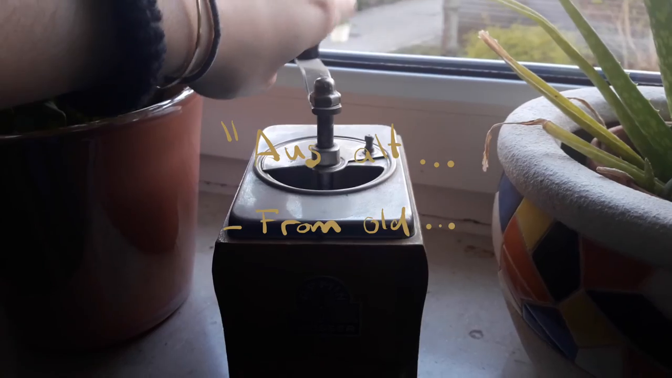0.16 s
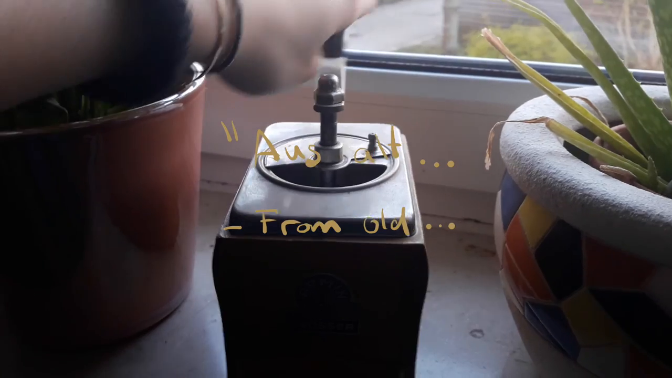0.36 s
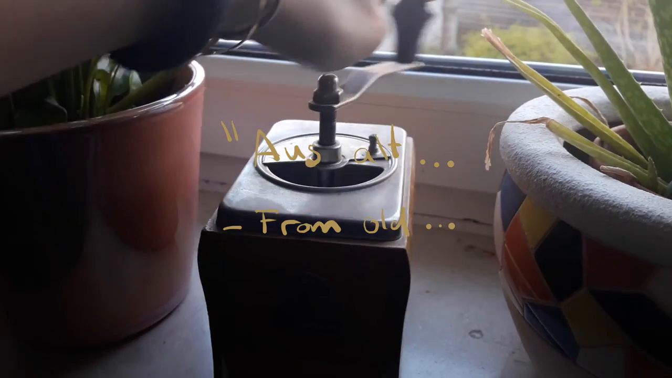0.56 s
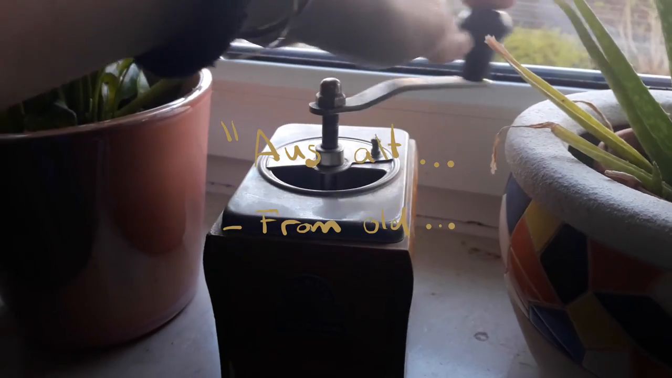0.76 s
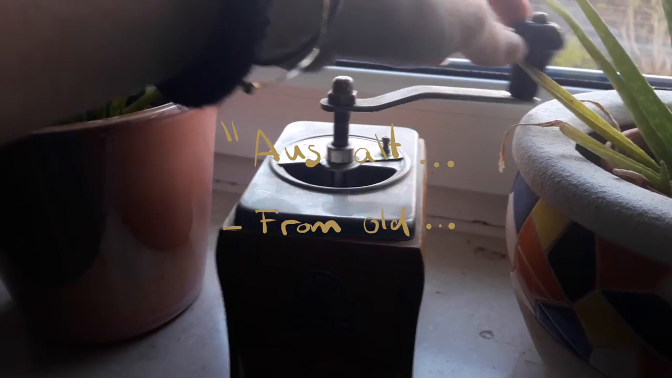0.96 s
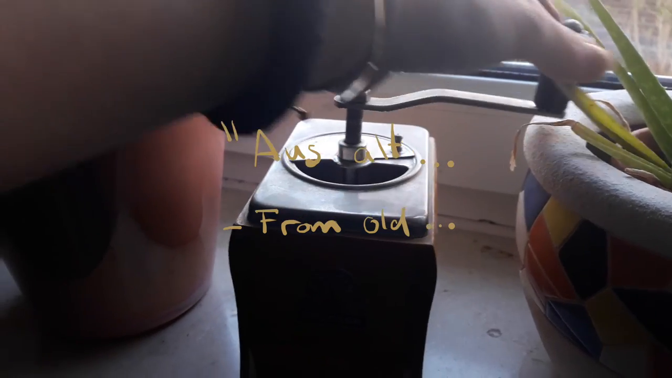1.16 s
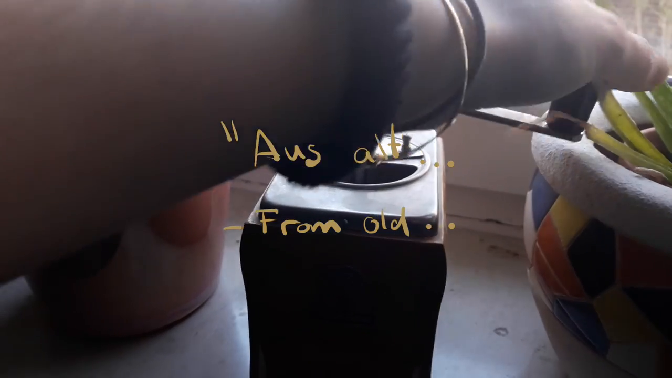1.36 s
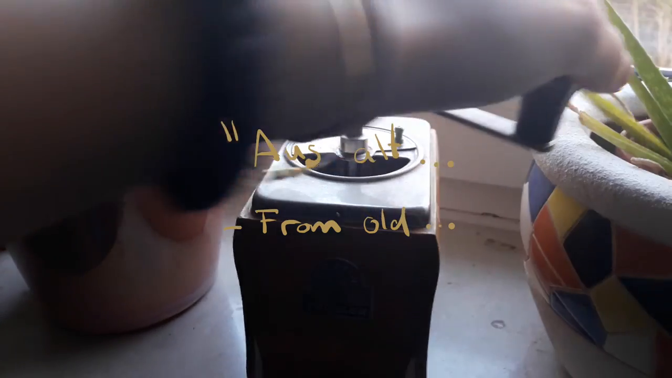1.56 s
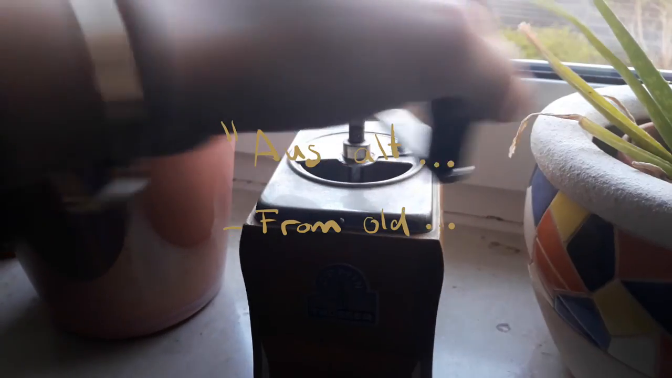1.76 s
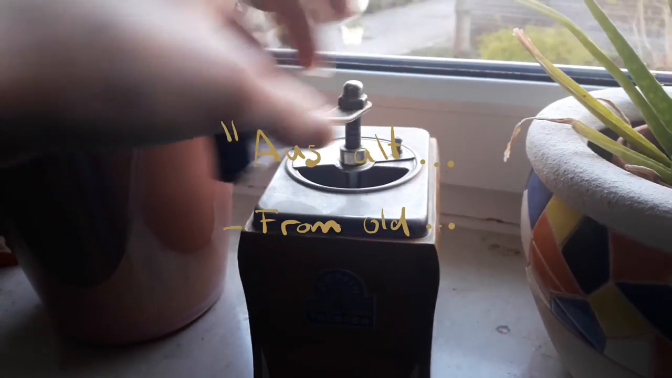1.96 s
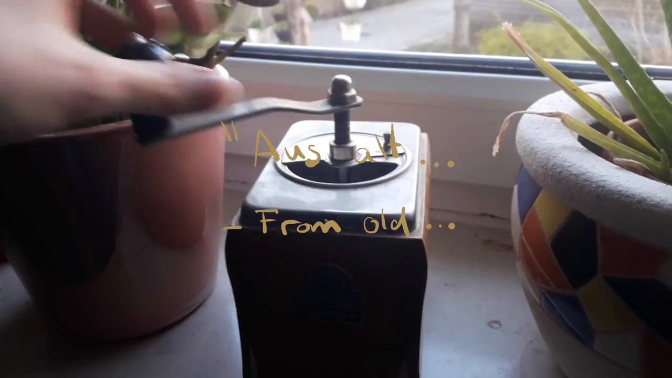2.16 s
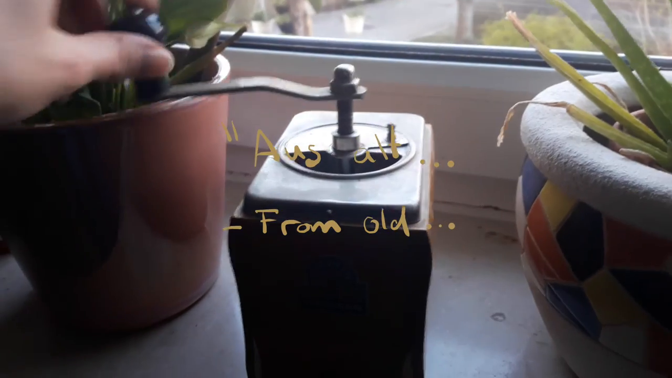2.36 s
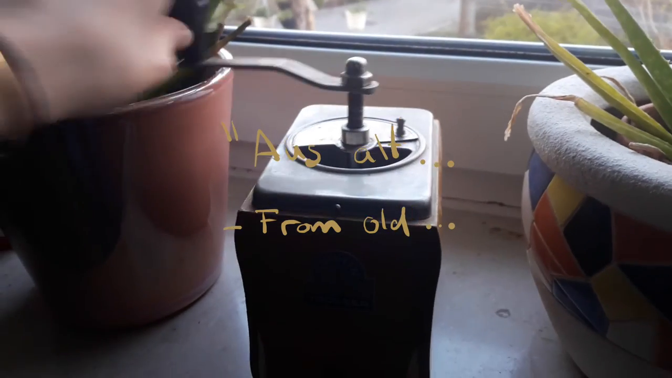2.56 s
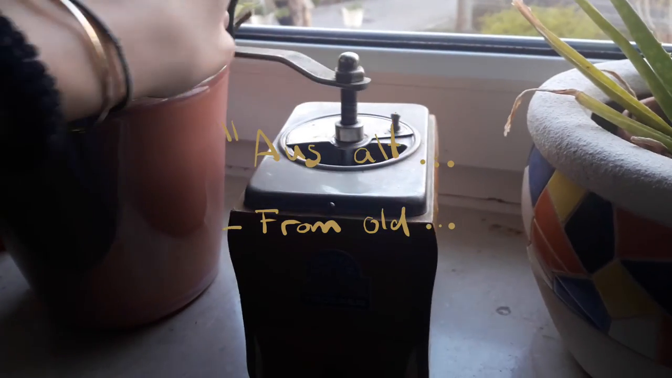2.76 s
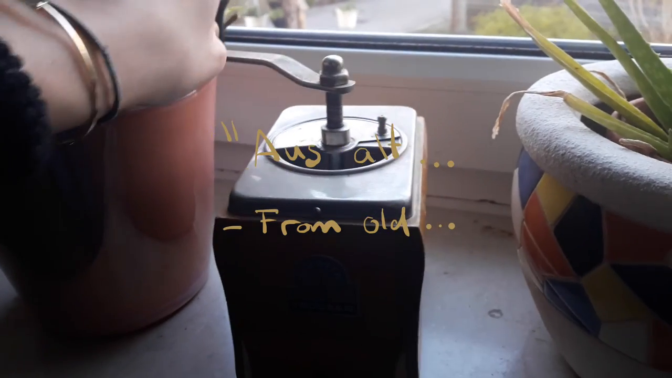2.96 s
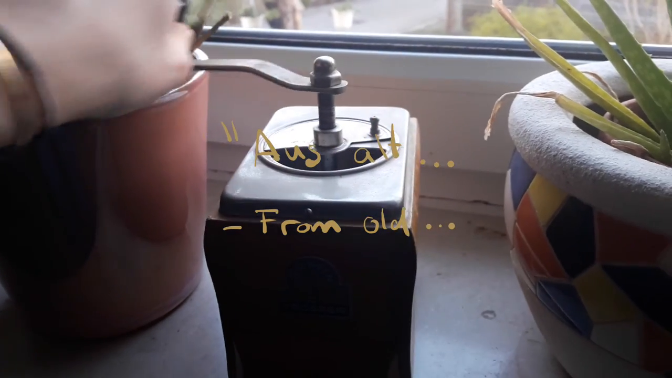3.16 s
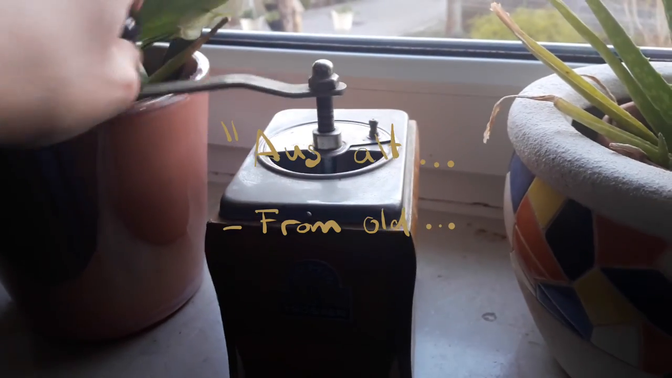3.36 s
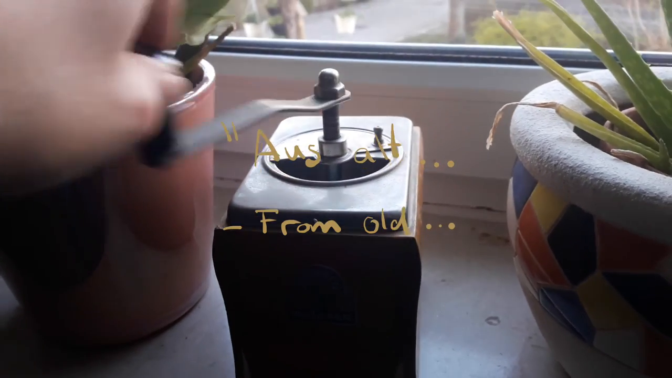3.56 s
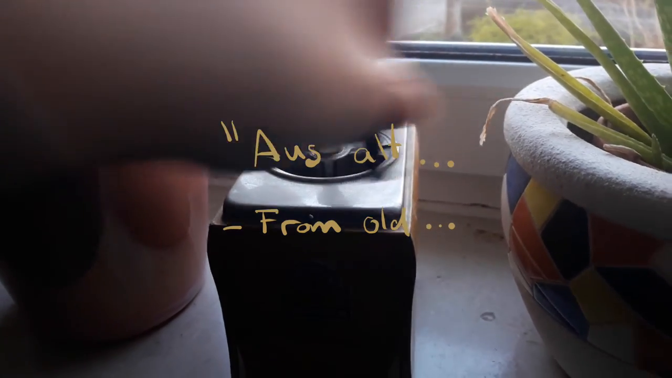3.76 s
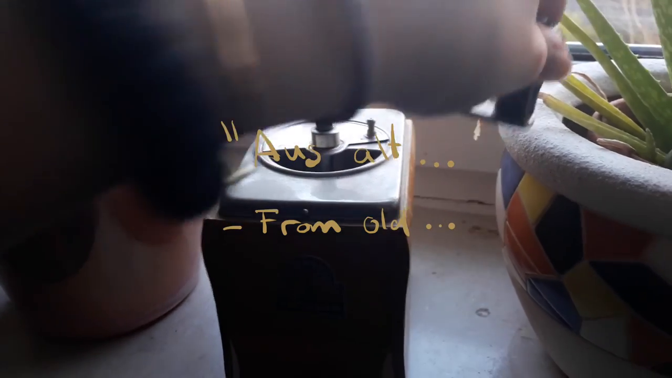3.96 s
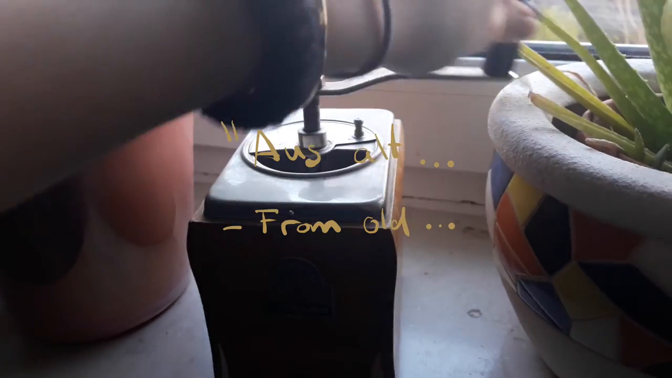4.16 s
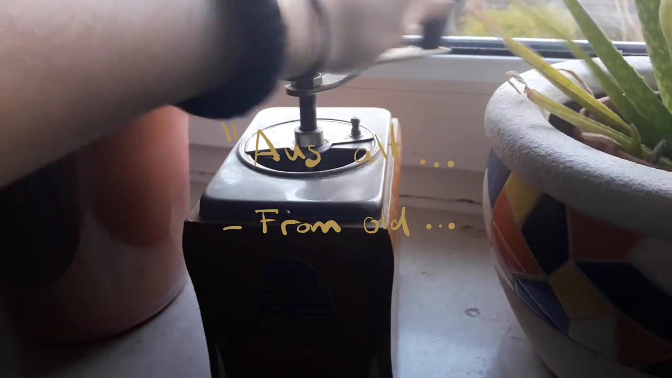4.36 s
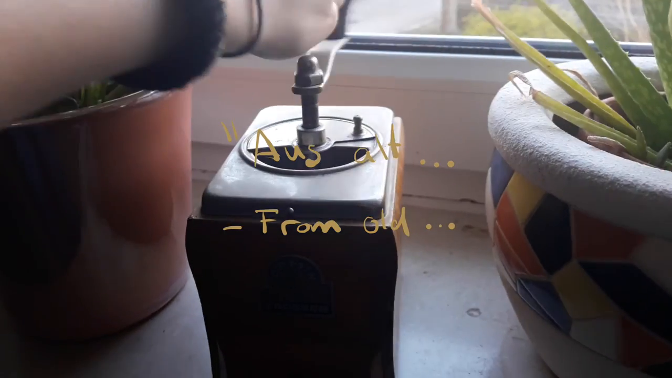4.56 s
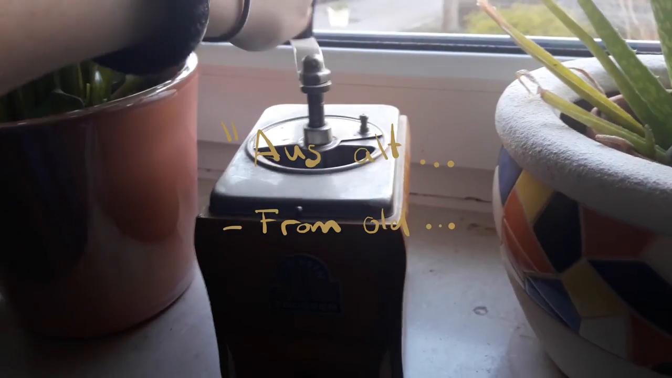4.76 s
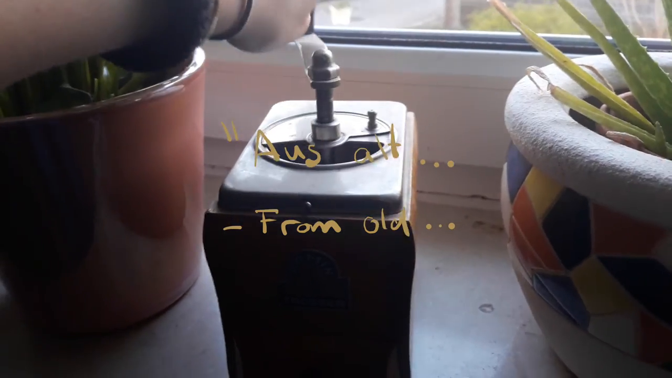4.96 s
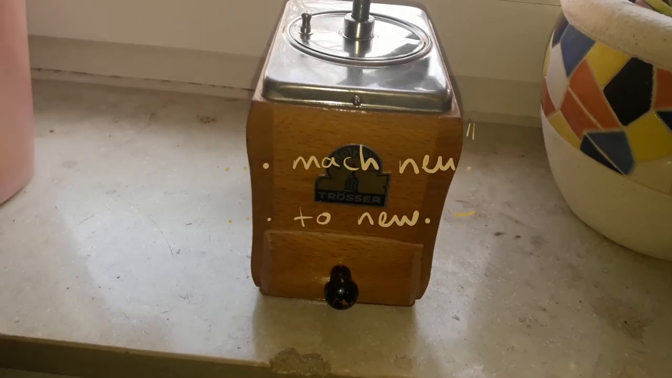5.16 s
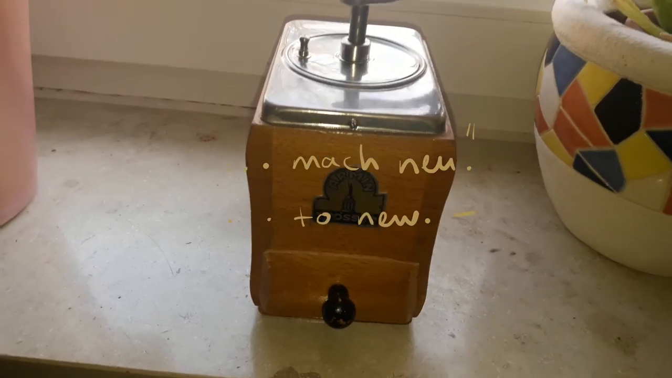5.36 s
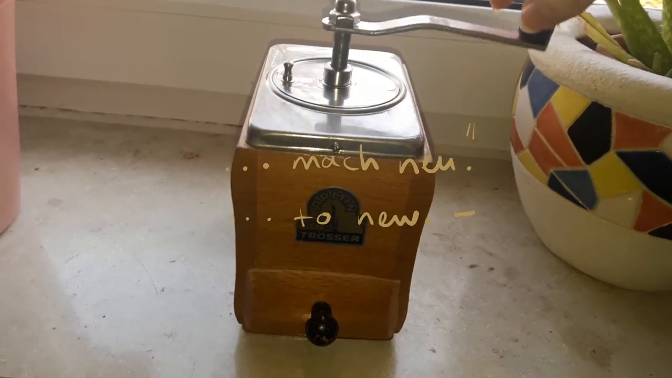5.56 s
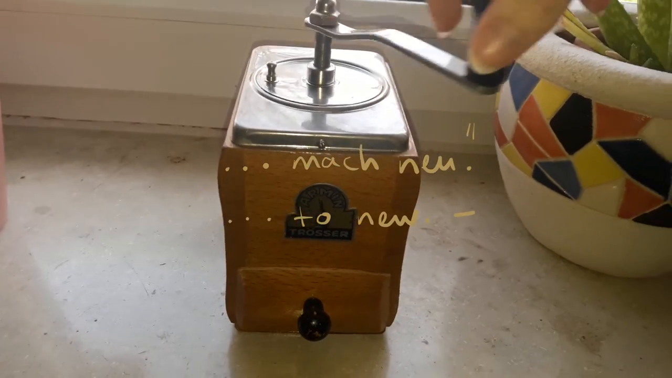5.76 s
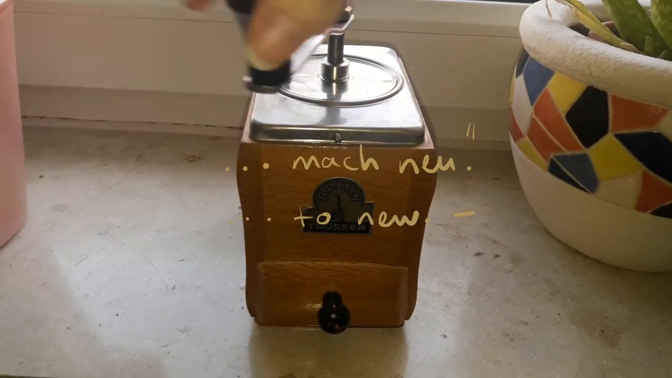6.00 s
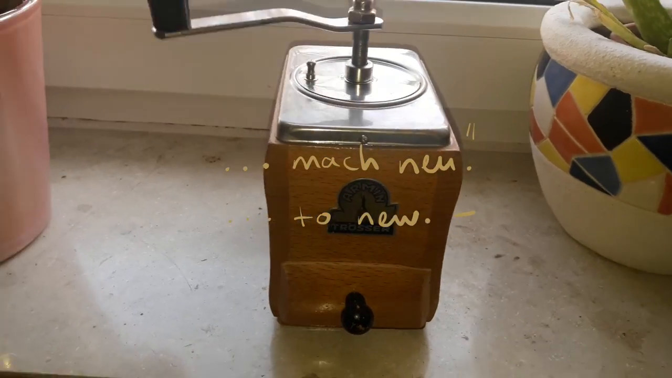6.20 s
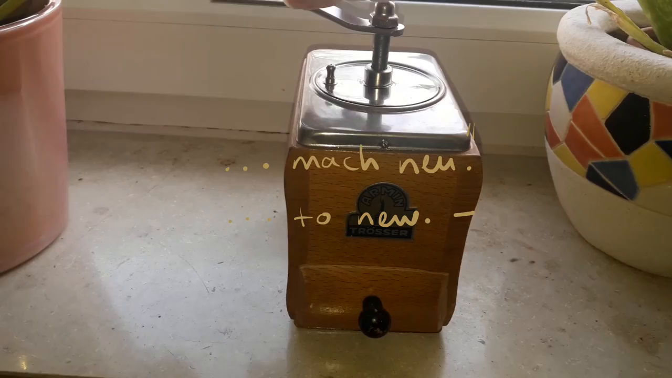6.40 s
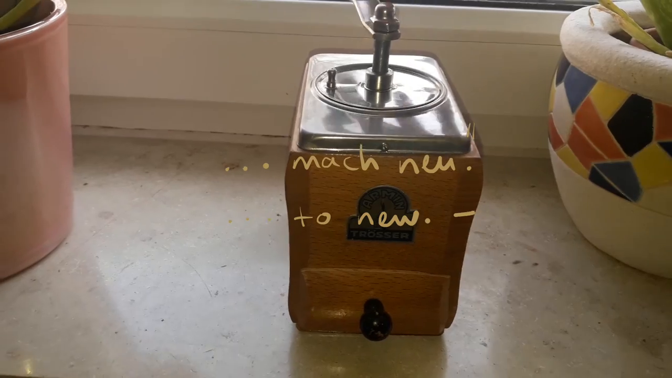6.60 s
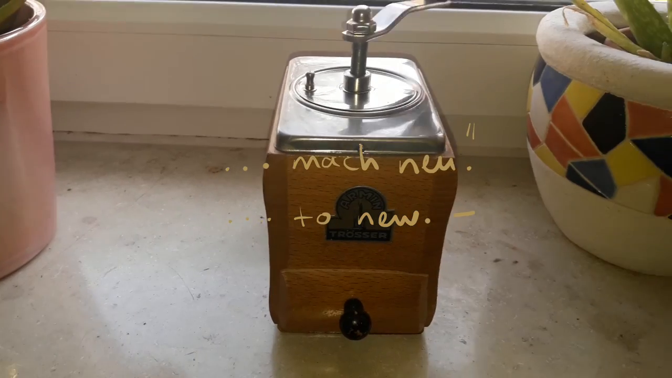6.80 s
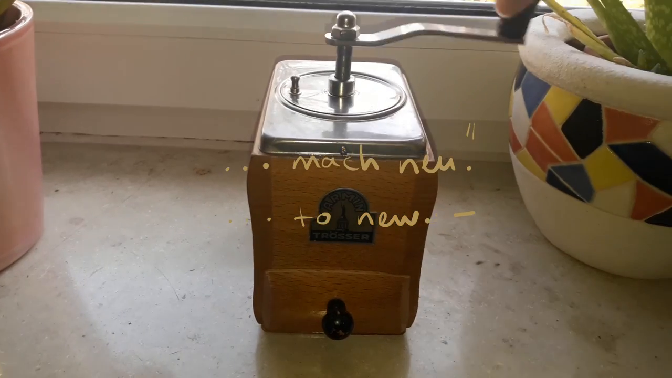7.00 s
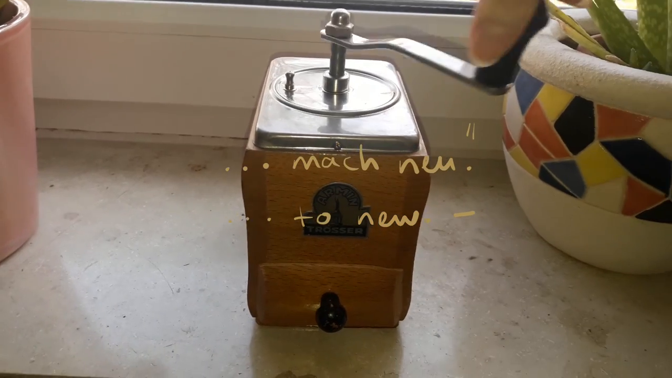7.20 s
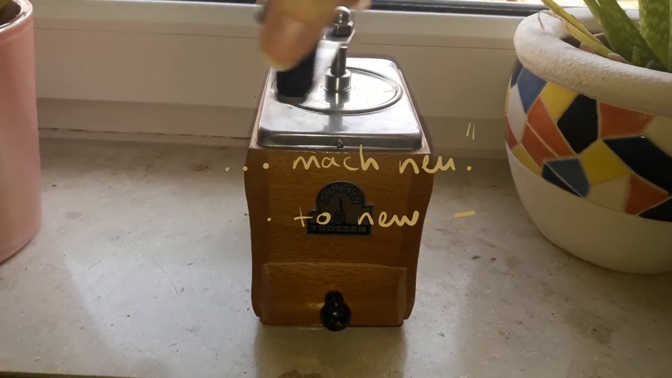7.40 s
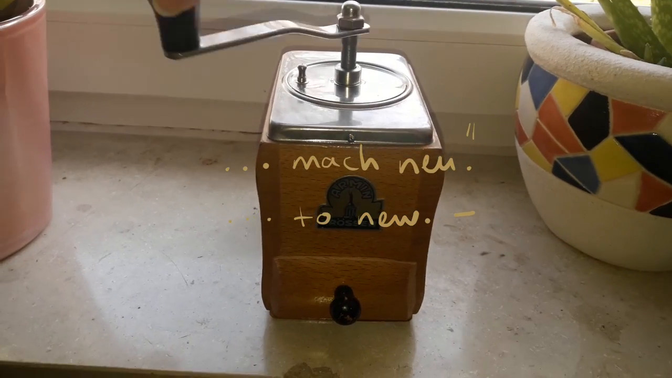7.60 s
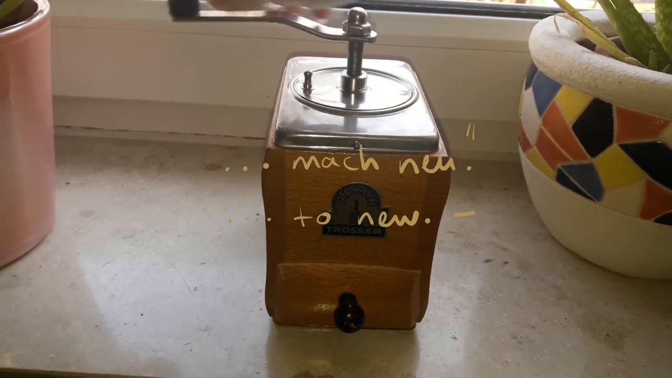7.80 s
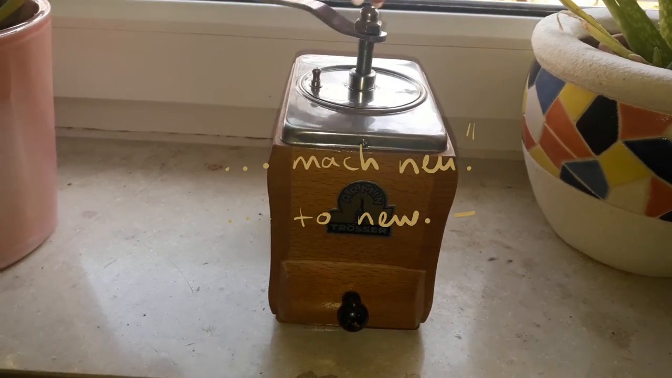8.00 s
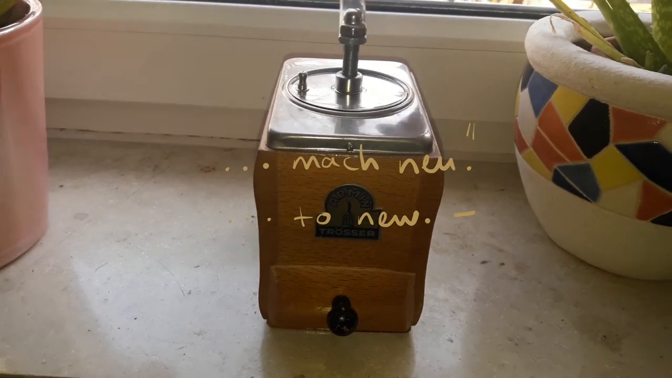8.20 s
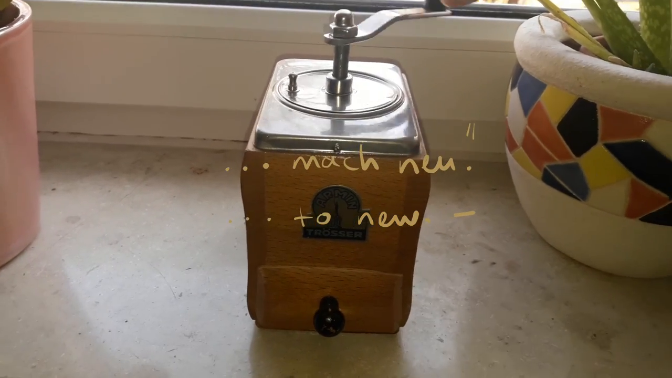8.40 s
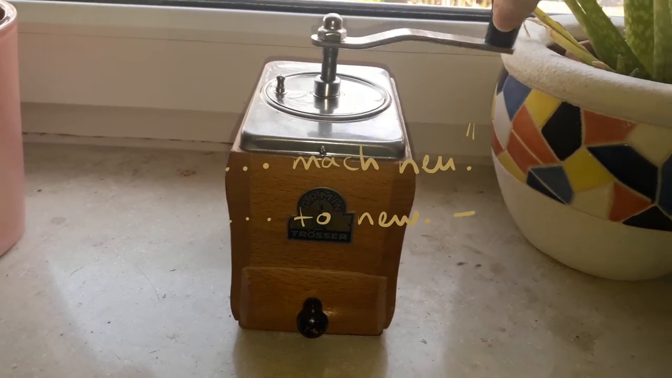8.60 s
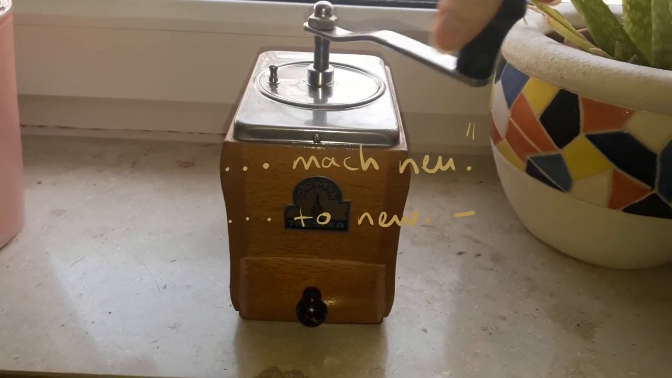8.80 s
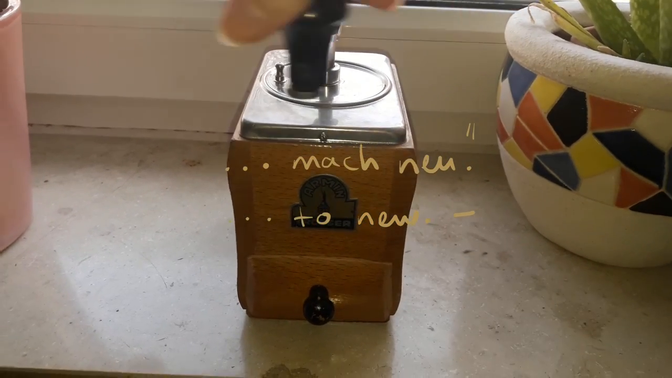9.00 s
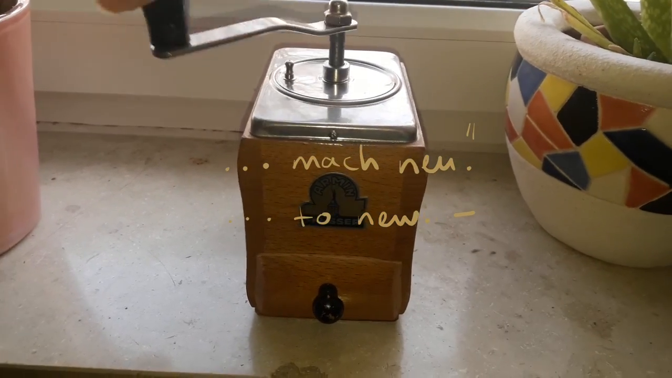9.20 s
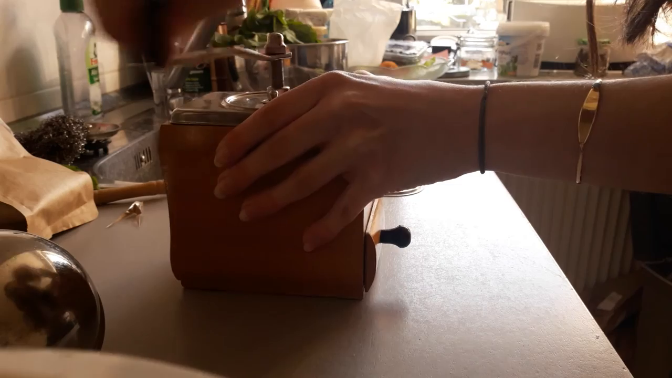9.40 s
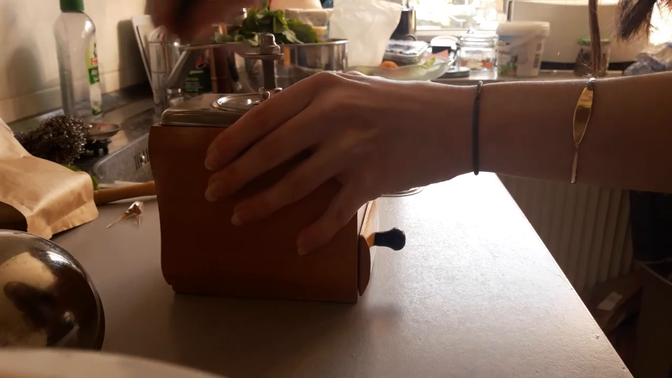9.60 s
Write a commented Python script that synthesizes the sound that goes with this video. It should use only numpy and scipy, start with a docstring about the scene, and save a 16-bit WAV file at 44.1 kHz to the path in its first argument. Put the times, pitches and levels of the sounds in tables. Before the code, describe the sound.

An old dry wooden hand mill scrapes, creaks and screeches in fits, then a newer empty one rasps through three turns before beans start crunching.

```python
"""Still kitchen air throughout, with a hum and later a rumble from outside: coloured noise and sines.
First an old wooden hand mill is cranked empty on the sill: grit scrapes, teeth catch, a sleeve brushes along.
Its dry spindle judders, creaks, squeaks and screeches near 3.5 s; a thin whistle follows near 5 s.
A newer empty mill then rasps through three turns, tight once in each: grit rings its box and hopper.
At the very end a mill on the worktop starts to crush beans: dense tiny blows on a heavy body."""
import sys
import numpy as np
from scipy import signal
from scipy.fft import rfft, irfft
from scipy.io import wavfile

SR = 44100
rng = np.random.default_rng(int(sys.argv[2]) if len(sys.argv) > 2 else 0)


def generate_wav(sig):
    """Save sig (samples, or channels by samples) to the path in sys.argv[1] as 16-bit PCM at SR."""
    pcm = np.round(np.clip(np.atleast_2d(sig).T, -1, 1) * 32767).astype(np.int16)
    wavfile.write(sys.argv[1], SR, pcm)


N = 425565
T = np.arange(N) / SR


def undb(db):
    """Decibels to gain."""
    return np.exp(np.asarray(db) * (np.log(10) / 20))


def unit(x):
    """Scale to rms 1."""
    return x / np.sqrt(np.mean(x ** 2))


def normal(y):
    """Scale to energy 1."""
    return y / np.sqrt(np.sum(y ** 2))


def curve(rows, axis=1):
    """One column of a table, joined by straight lines."""
    rows = np.asarray(rows)
    return np.interp(T, rows[:, 0], rows[:, axis])


def swell(rows, axis=1):
    """Gain from a dB column, silent outside the table's time."""
    rows, gain = np.asarray(rows), np.zeros(N)
    inside = (T >= rows[0, 0]) & (T <= rows[-1, 0])
    gain[inside] = undb(np.interp(T[inside], rows[:, 0], rows[:, axis]))
    return gain


def walk(rate):
    """Random drift with a spread near 1: `rate` chance values a second, joined by straight lines."""
    knots = rng.standard_normal(40000)
    return 1.2 * np.interp(T * rate, np.arange(len(knots)), knots)


def cycles(hz):
    """Sine that follows a changing pitch."""
    return np.sin(2 * np.pi * np.cumsum(hz) / SR)


def stroke(start, end, attack_s, release_s):
    """Gain of one movement: it builds up, holds and dies away."""
    attack = np.clip((T - start) / attack_s, 0, 1)
    release = np.exp(-np.maximum(T - end, 0) / release_s)
    return attack * release * (T < end + 10 * release_s)


def strokes(rows, attack_s, release_s):
    """Gain of a run of (start, end, dB) movements."""
    return sum(undb(db) * stroke(start, end, attack_s, release_s) for start, end, db in rows)


def hump(middle, width_s):
    """A smooth rise to 1 and back."""
    return np.exp(-np.minimum(((T - middle) / width_s) ** 2, 20))


def colour(x, points):
    """Causal minimum-phase filter with the given (Hz, dB) outline."""
    hz, db = np.transpose(points)
    size = 4096
    f = np.maximum(np.arange(size // 2 + 1) * SR / size, 1)
    outline_db = np.interp(np.log(f), np.log(hz), db)
    cepstrum = irfft(np.log(undb(outline_db)))
    # folding the cepstrum forward puts the energy as early as it can be
    cepstrum[1:size // 2] *= 2
    cepstrum[size // 2 + 1:] = 0
    response = irfft(np.exp(rfft(cepstrum)))
    return signal.fftconvolve(x, response)[:len(x)]


def ring(x, response):
    """Drive a body with a force, from its first push to its last."""
    first, last = np.flatnonzero(x)[[0, -1]]
    y = signal.fftconvolve(x[first:last + 1], response)
    return np.pad(y, (first, N))[:N]


def tail(t60):
    """Dense decaying reflections of energy 1, a quarter second long."""
    t = T[:SR // 4]
    return normal(rng.standard_normal(len(t)) * np.exp(-np.log(1000) * t / t60))


def body(points, t60, rattle_db, room_db):
    """Response to one blow: the crack, a short rattle inside the box, the kitchen."""
    y = undb(rattle_db) * tail(t60) + undb(room_db) * tail(0.47)
    y[0] += 1
    return normal(colour(y, points))


def modes(rows):
    """Response of (Hz, width Hz, dB) resonances with alternating sign, energy 1."""
    t, y = T[:SR // 4], 0
    for k, (hz, width, db) in enumerate(rows):
        decay = width * np.exp(-np.pi * width * t)
        y = y + (-1) ** k * undb(db) * decay * np.sin(2 * np.pi * hz * t)
    return normal(y)


def grit(rate, spread_db, clump_hz, clump_db):
    """Tiny collisions of uneven size, `rate` a second on average, that come in clumps; rms 1."""
    hits, force = np.flatnonzero(rng.random(N) < rate / SR), np.zeros(N)
    size, side = rng.standard_normal((len(hits), 2)).T
    clump = np.clip(walk(clump_hz)[hits], -2, 2)
    force[hits] = np.sign(side) * undb(spread_db * np.clip(size, -2, 2) + clump_db * clump)
    return unit(force)


def blows(rows, response, skid_s, skid):
    """Each blow skids on for a moment before the parts come free."""
    out, t = np.zeros(N + SR), T[:SR // 20]
    for s, db in rows:
        sparse = skid * rng.standard_normal(len(t)) * (rng.random(len(t)) < .05)
        force = sparse * np.exp(-t / skid_s)
        force[0] = 1
        y = signal.fftconvolve(force, response)
        start = int(s * SR)
        out[start:start + len(y)] += undb(db) * y / np.abs(y).max()
    return out[:N]


# All source levels below are relative: each layer is trimmed again where it is mixed.
# colour of the still air: f/Hz, level/dB
AIR_COLOUR = [(24, -34), (40, -12), (108, -8), (150, -5.5), (188, -10), (387, -10.5), (438, -11),
              (1130, -14.5), (1560, -18.5), (2110, -20.5), (2330, -20.5), (4240, -26.5), (6980, -29.5),
              (8110, -36), (15500, -27.5)]
AIR_DB = -61
# low hum from outside: start t/s, end t/s, level/dB
HUMS = [(2.3, 2.45, -68), (2.7, 4.35, -66.5), (4.4, 5.03, -61.5)]
# deep rumble from outside: start t/s, end t/s, level/dB
RUMBLE_SWELLS = [(6.5, 7.45, -60), (7.5, 8.15, -62.5)]


def kitchen():
    """Noise for still air, with a wavering sine hum and a low sine rumble from beyond the window."""
    air = unit(colour(rng.standard_normal(N), AIR_COLOUR)) * undb(AIR_DB + 0.2 * walk(7.4))
    hum = strokes(HUMS, attack_s=0.082, release_s=0.072) * cycles(156 + 7 * walk(2.3) + 6 * walk(30))
    hum *= undb(2 * walk(12))
    rumble = strokes(RUMBLE_SWELLS, attack_s=0.41, release_s=.15) * cycles(43 + walk(1.4))
    return undb(-1.5) * air + undb(-1.5) * hum + undb(-6.0) * rumble


# colour of beans cracking in box and worktop: f/Hz, level/dB
CRUSH_COLOUR = [(29, -62), (65, -33), (108, -1), (200, -4.5), (262, -17), (310, -7), (520, 1), (870, -9),
                (1220, -7.5), (1410, -17.5), (1550, -13.5), (3260, -20), (4340, -25.5), (7190, -30),
                (15500, -44)]
BEANS_START_S, BEANS_DB, BEANS_FADE_DB_PER_S = 9.427, -23.5, 31


def beans():
    """Beans crack between the burrs, hardest at first, and shake box and worktop."""
    response = body(CRUSH_COLOUR, t60=0.021, rattle_db=-0.5, room_db=-6.5)
    response += undb(-11.5) * modes([(108, 10.5, 18), (193.0, 34, 16), (507, 69, -17.0), (645, 62, -17)])
    fade_db = BEANS_FADE_DB_PER_S * np.maximum(T - BEANS_START_S, 0)
    press = stroke(BEANS_START_S, T[-1], attack_s=.003, release_s=.02) * undb(BEANS_DB - fade_db)
    return undb(1.0) * ring(press * grit(rate=1800, spread_db=3, clump_hz=118.2, clump_db=2), response)


# cloth rubbing: start t/s, end t/s, level/dB
SLEEVE_RUBS = [(0.37, 0.51, -56.5), (0.65, 0.72, -62), (2.48, 2.66, -62.5), (2.67, 2.83, -56.5),
               (3.02, 3.21, -57), (3.25, 3.31, -60)]
# colour of the cloth: f/Hz, level/dB
CLOTH_COLOUR = [(710, -42), (1200, -9.5), (1650, -11), (1800, -9), (2740, -12.5), (4200, 2.5), (5670, -13),
                (6870, -2.5), (7980, -19), (15500, -17.5)]
# skin sliding on the knob: start t/s, end t/s, level/dB
FINGER_SLIDES = [(1.438, 1.447, -49), (1.51, 1.61, -66.5), (4.05, 4.138, -45.5)]
# colour of the skin: f/Hz, level/dB
SKIN_COLOUR = [(2940, -19), (5000, -10), (6970, -4), (7940, -18), (11100, -4.5), (14100, 1), (15800, -2)]
# light metal ticks of crank and bangles: t/s, peak level/dB
METAL_TICKS = [(1.4435, -32.5), (1.591, -31), (2.616, -39), (2.7077, -45), (4.1052, -14.5), (4.44, -13),
               (4.4898, -22), (4.7696, -40.5), (5.0774, -39), (6.5141, -48)]
# ringing crank: f/Hz, level/dB, t60/s
CRANK_RING = [(1860, -4.5, 0.086), (2800, -10, 0.087), (3700, -6.5, 0.14), (4350, -3.5, 0.058),
              (6850, -6.5, 0.11), (7550, -10, 0.098), (8796, -20, 0.13), (9010, -5, 0.11)]
# the box rocks back on the sill: t/s, peak level/dB
SILL_KNOCKS = [(4.441, -28.5), (4.457, -35.5), (4.515, -53)]
# colour of a knock on the sill: f/Hz, level/dB
SILL_COLOUR = [(59, -48), (100, -26), (189, -1.5), (297, -15.5), (560, -2.5), (663, -9), (1070, -17),
               (1200, -12), (1500, -29), (1950, -51), (3300, -120)]


def handling():
    """Sleeve and fingers rub as fine grit; crank ticks and sill knocks strike ringing bodies."""
    cloth = colour(grit(rate=2500, spread_db=2.5, clump_hz=120.3, clump_db=3.5), CLOTH_COLOUR)
    sleeve = unit(cloth) * strokes(SLEEVE_RUBS, attack_s=0.024, release_s=.025)
    skin = colour(grit(rate=3900, spread_db=4, clump_hz=213, clump_db=1.5), SKIN_COLOUR)
    fingers = unit(skin) * strokes(FINGER_SLIDES, attack_s=0.011, release_s=0.0069)

    # a mode's width follows from its decay time
    crank = modes([(hz, np.log(1000) / np.pi / t60, db) for hz, db, t60 in CRANK_RING])
    tick = crank + body([(500, -28), (3000, 6.5), (7000, 1.5), (15000, -3)],
                        t60=0.024, rattle_db=-0.5, room_db=-6.5)
    thud = body(SILL_COLOUR, t60=0.047, rattle_db=-5, room_db=-3.0)
    thud += undb(-3.5) * modes([(350, 62, 2.5), (560, 25, -6), (1038, 22, 1)])
    ticks = blows(METAL_TICKS, tick, skid_s=0.0026, skid=0.5)
    knocks = blows(SILL_KNOCKS, thud, skid_s=0.0065, skid=0.37)
    return undb(2.5) * sleeve + undb(6.5) * fingers + undb(-5.5) * ticks + undb(4) * knocks


# one thin, pure squeak: t/s, f/Hz, level/dB
THIN_SQUEAK = [(4.985, 9350, -76.5), (4.995, 9390, -30.5), (5.005, 9500, -34), (5.025, 9340, -25.5),
               (5.05, 9200, -35), (5.068, 9040, -30), (5.085, 8900, -61), (5.118, 9000, -88)]


def whistle():
    """A single gliding, mostly falling partial with a short echo."""
    y = np.sqrt(2) * swell(THIN_SQUEAK, axis=2) * cycles(curve(THIN_SQUEAK))
    return undb(1) * y + undb(-7) * ring(y, tail(0.081))


# turns of the newer mill, each with one tight spot:
# start t/s, end t/s, pressure level/dB, tight spot t/s, extra pressure there level/dB
TURNS = [(5.142, 6.038, -40.5, 5.52, 5.5), (6.602, 7.454, -38.5, 7.01, 7), (8.12, 9.112, -39, 8.58, 8)]
# small nudges of its crank between turns: start t/s, end t/s, pressure level/dB
NUDGES = [(5.01, 5.09, -51.5), (6.22, 6.24, -61), (6.345, 6.39, -53), (7.96, 8.06, -41)]
TURN_ATTACK_S, TURN_RELEASE_S, TIGHT_S = 0.062, 0.03, .13  # TIGHT_S: half the time spent in the tight spot
# the hopper sings most a part of a turn after the tight spot
SONG_LAG_S, SONG_WIDTH_S, SONG_RISE_DB = 0.35, 0.12, 11.5


def new_pressure():
    """Force on burrs and hopper: even through a turn, except where the off-centre cone runs tight."""
    burrs = hopper = strokes(NUDGES, attack_s=0.0075, release_s=0.021)
    for start, end, db, tight, extra_db in TURNS:
        turn = undb(db) * stroke(start, end, TURN_ATTACK_S, TURN_RELEASE_S)
        burrs = burrs + turn * undb(extra_db * hump(tight, TIGHT_S))
        hopper = hopper + turn * undb(SONG_RISE_DB * hump(tight + SONG_LAG_S, SONG_WIDTH_S))
    return burrs, hopper


# the crank gathers speed early in each turn, and the rasp brightens with it
SPIN_UP_S, SLOW_TREBLE_DB, TREBLE_HZ = 0.47, -6.5, 1800


def brighten(x):
    """Slow burrs strike softly: the treble comes in as each turn gathers speed."""
    speed = sum(stroke(start, end, SPIN_UP_S, release_s=0.3) for start, end, *_ in TURNS)
    speed = np.clip(speed, 0, 1)
    bass = signal.sosfiltfilt(signal.butter(2, TREBLE_HZ, fs=SR, output="sos"), x)
    return bass + (x - bass) * undb(SLOW_TREBLE_DB * (1 - speed))


# colour of the newer box: f/Hz, level/dB
NEW_BOX_COLOUR = [(88, -38), (150, -23), (286, -12.5), (525, 5), (611, 3), (828, 4.5), (982, -4.5),
                  (1280, 4), (1550, -5.5), (2490, -14), (2950, -4.5), (3370, -17.5), (7070, -37.5),
                  (8550, -51), (14000, -43)]
# resonances of the newer mill: f/Hz, width f/Hz, level/dB
NEW_RESONANCES = [(556, 60, 5.5), (929, 34, 5), (1310, 63, -24), (1660, 30, -5), (1977, 37, 3.5),
                  (2264, 82, -0.5), (2960, 56, -25), (3410, 59, -71), (5500, 210, -47), (5880, 220, -58.5),
                  (7005, 180, -24.5), (10300, 360, -36)]
# colour of one sharp burr tooth: f/Hz, level/dB
NEW_TOOTH_COLOUR = [(180, -40), (300, -5.5), (1200, -2), (2350, -9), (3040, 0), (3510, -8), (4400, -18.5),
                    (5420, -22), (6270, -26.5), (7130, -31), (8500, -63), (10500, -35), (14000, -86.5)]
# sharp burr teeth catching: t/s, peak level/dB
NEW_TEETH = [(5.2015, -37), (5.4292, -30.5), (5.465, -24.5), (5.5621, -19.5), (5.6347, -29),
             (5.7012, -27.5), (5.8555, -24), (5.9405, -26), (6.0086, -25.5), (6.085, -33), (6.617, -33.5),
             (6.7613, -25), (6.797, -24), (6.992, -18.5), (7.0265, -18.5), (7.0733, -23), (7.095, -23.5),
             (7.2181, -24), (7.4326, -25), (7.5053, -30), (7.872, -29), (7.9628, -24.5), (8.1526, -28),
             (8.3655, -26), (8.4837, -20.5), (8.4993, -19.5), (8.529, -26), (8.5636, -24.5),
             (8.5735, -18.5), (8.61, -21), (8.666, -20.5), (8.8205, -22.5)]


def new_mill():
    """Sharp burrs rasp evenly; harder pressure brings out the single teeth and the boom of the box."""
    press, hopper_press = new_pressure()
    hard = press ** 2 / press.max()
    box = body(NEW_BOX_COLOUR, t60=0.038, rattle_db=2.5, room_db=-14.0) + undb(-7) * modes(NEW_RESONANCES)
    scrape = grit(rate=1100, spread_db=4.5, clump_hz=139.5, clump_db=3.0) * undb(1.66 * walk(45))
    rasp = ring(press * scrape, box)

    hopper = modes([(1215, 48, -0.5), (1313, 59, -0.5), (1477, 116, -11.5), (1964, 25, -2), (3057, 136, -7)])
    song = ring(scrape * hopper_press, hopper)
    hollow = colour(modes([(423.6, 59, -2), (523, 53, 0.5)]),
                    [(220, -23), (400, 0.5), (650, -1.5), (1300, -10.5)])
    boom = ring(hard * grit(rate=600, spread_db=3.5, clump_hz=60.1, clump_db=3), hollow)

    tooth = body(NEW_TOOTH_COLOUR, t60=0.015, rattle_db=-1.0, room_db=-12.5)
    tooth += undb(-3.5) * modes([(1281, 86, -11.0), (3057, 80, 3.0)])
    teeth = ring(hard * grit(rate=220, spread_db=5.5, clump_hz=39.76, clump_db=8.5), tooth)
    catches = blows(NEW_TEETH, tooth, skid_s=0.004, skid=0.48)
    mix = rasp + undb(-12.0) * song + undb(-6.5) * boom + undb(-7) * teeth + undb(0.5) * catches
    return brighten(mix)


# faint creaks of the old spindle: start t/s, end t/s, level/dB
FAINT_CREAKS = [(3.05, 3.08, -65), (3.17, 3.22, -60.5), (3.31, 3.345, -60.5), (3.475, 3.505, -50)]
CREAK_HZ = 810


def creaks():
    """Short, unsteady shudders of the slowly moving spindle."""
    pitch = CREAK_HZ + 25 * walk(8) + 35 * walk(150)
    return np.sqrt(2) * strokes(FAINT_CREAKS, attack_s=.012, release_s=.015) * cycles(pitch)


# low groan of the spindle under the screech: t/s, f/Hz, level/dB
LOW_GROAN = [(3.71, 756.2, -45), (3.738, 748, -42), (3.842, 742, -36.5), (3.884, 739, -35),
             (3.904, 815, -49), (3.92, 757.0, -53)]


def groan():
    """The spindle shudders slowly as it binds: one sine, unsteady in pitch and level."""
    level = undb(-1.5) * swell(LOW_GROAN, axis=2) * undb(2 * walk(60))
    return np.sqrt(2) * level * cycles(curve(LOW_GROAN) + 10 * walk(80))


# two squeaks of the spindle, each sagging in pitch as it grows loud:
# t/s, fundamental f/Hz, fundamental level/dB, octave level/dB, roughness 0-1
SPINDLE_SQUEAKS = [
    [(3.385, 3790, -62.5, -82, 0.1), (3.4, 3810, -31.5, -53, 0.25), (3.42, 3750, -25, -42.5, 0.2),
     (3.43, 3673, -19, -36, 0.17), (3.442, 3722, -42.5, -54, 0.24), (3.463, 3640, -59, -71, 0.2)],
    [(3.463, 3680, -57, -71, 0.17), (3.477, 3536, -16.5, -31, 0.27), (3.495, 3453, -17.5, -22.5, 0.2),
     (3.522, 3466, -16.5, -21, 0.3), (3.548, 3580, -30, -40.5, 0.2), (3.562, 3713, -18.5, -28, 0.2),
     (3.58, 3804, -19.5, -43, 0.35), (3.598, 3730, -49, -49, 0.3)],
]
# the spindle binds and screeches, jumping between fundamental and octave:
# t/s, fundamental f/Hz, fundamental level/dB, octave level/dB, roughness 0-1
SPINDLE_SCREECH = [(3.68, 4370, -42, -60.5, 0.68), (3.7, 4550, -26.5, -40.5, 1),
                   (3.714, 4486, -24, -15, 0.59), (3.732, 4530, -13.5, -23, 0.19),
                   (3.763, 4514, -14.5, -30.5, 0.36), (3.788, 4410, -45, -17, 0.1),
                   (3.81, 4460, -22, -22, 0.45), (3.825, 4450, -17, -15, 0.23),
                   (3.848, 4550, -35, -26, 0.5), (3.862, 4493, -51.5, -28.5, 0.17),
                   (3.91, 4468, -64.5, -59.5, 0.1)]
# colour of the rough slipping: f/Hz, level/dB
SLIP_COLOUR = [(2500, -18.5), (4200, 0.5), (5200, -9.5), (6100, -6.5), (7200, -6), (8000, -20.5),
               (9500, -7), (12000, -17.5), (13500, -14.5), (15500, -18.5)]


def squeal(rows, third_db, fourth_db, jitter, shimmer, rasp_db, ring_db):
    """The spindle sings in its bearing; rough slips smear the partials and ring the crank's other modes."""
    rough = curve(rows, axis=4)
    phase = 2 * np.pi * np.cumsum(curve(rows) * (1 + jitter * rough * walk(700))) / SR
    first, second = swell(rows, axis=2), swell(rows, axis=3)
    partials = [first, second, undb(third_db) * first, undb(fourth_db) * first]
    tone = 0
    for k, gain in enumerate(partials):
        flicker = 1 + np.tanh(shimmer * rough * walk(450))
        tone = tone + gain * flicker * np.sin((k + 1) * phase)

    slip = rng.standard_normal(N) * undb(2 * walk(250)) * rough * (first + second)
    steel = modes([(4365, 180, 3.0), (4303, 38, -1.5), (6135, 52, -6), (7000, 150, -6.5), (9040, 25, -4.5),
                   (11110, 60, -7.5), (10800, 40, -18), (12450, 100, -11.5), (13500, 200, -10)])
    steel += undb(-1.0) * body(SLIP_COLOUR, t60=0.015, rattle_db=-8, room_db=-15.5)
    y = np.sqrt(2) * tone + undb(rasp_db) * ring(slip, steel)
    y = colour(y, [(300, -30.0), (1500, -11.5), (3000, -0.5), (15000, 0.5)])  # the squeal carries no bass
    return y + undb(ring_db) * ring(y, tail(0.18))


# bursts of stick and slip in the old mill: middle t/s, level/dB, rise and fall t/s each
STICK_SLIPS = [(1.645, -29, 0.014), (1.662, -37.5, 0.0061), (1.687, -25, 0.012), (1.699, -26.5, 0.01),
               (1.733, -40, 0.015), (1.758, -27, 0.015), (2.319, -56, 0.048), (4.161, -29, 0.0026),
               (4.254, -37.5, 0.014), (4.279, -31.5, 0.01), (4.294, -33.5, 0.012), (4.31, -30.5, 0.015),
               (4.333, -31, 0.02), (4.352, -30.5, 0.013), (4.365, -35.5, 0.022)]
# colour of the stick and slip: f/Hz, level/dB
STICK_SLIP_COLOUR = [(530, -46.5), (900, -23), (1460, -3), (1600, 0.5), (1890, -16.5), (2660, -15.5),
                     (3210, -2.5), (3920, -10), (4570, -5), (5140, -25.5), (6280, -15.5), (8430, -35.5),
                     (15000, -39)]


def judder(slip_hz=1560, rise=.07, wander=0.031, scatter_db=6.0):
    """The dry cone sticks and slips in short bursts near a hopper resonance, faster when pressed harder."""
    press = sum(swell([(s - length, db - 14.0), (s, db + 4), (s + length, db - 15)])
                for s, db, length in STICK_SLIPS)
    rate = slip_hz * (1 + rise * np.sqrt(press / press.max()) + wander * walk(900))
    phase = np.cumsum(rate) / SR
    # one pulse a cycle, each of its own size
    slips = np.diff(np.floor(phase), prepend=0) * undb(scatter_db * walk(1500))
    force = unit(slips - slips.mean()) + undb(-1.5) * rng.standard_normal(N)

    response = body(STICK_SLIP_COLOUR, t60=0.019, rattle_db=-1.5, room_db=-17.0)
    response += undb(-16.0) * modes([(1596, 13, 25.5), (1650, 44, 9), (3130, 26, -5), (3180, 46, -7),
                                     (4440, 120, -13)])
    response /= np.std(signal.fftconvolve(force[:SR], response, "valid"))  # steady force gives rms near 1
    return undb(2.5) * ring(force * press, response)


# the old crank moves in fits and starts:
# start t/s, end t/s, pressure at the start level/dB, pressure at the end level/dB
PUSHES = [(0.144, 0.17, -56, -62.5), (0.263, 0.55, -53.5, -45.5), (0.564, 0.572, -37, -41),
          (0.624, 0.991, -44.5, -48), (1.119, 1.161, -39, -43.5), (1.222, 1.257, -47, -46.5),
          (1.299, 1.343, -46.5, -45.5), (1.41, 1.606, -54.5, -48), (1.613, 1.846, -42, -41.5),
          (1.852, 1.997, -36.5, -36.5), (2.036, 2.095, -57, -54), (2.286, 2.367, -50, -56.5),
          (3.562, 3.87, -37, -36), (3.885, 4.04, -38.5, -40.5), (4.052, 4.215, -40, -37),
          (4.244, 4.394, -48, -40.5), (4.436, 4.55, -54, -50.5)]
PUSH_ATTACK_S, PUSH_RELEASE_S = 0.0086, 0.036


def old_pressure():
    """Each push on the old crank tightens or eases steadily until the hand halts."""
    press = 0
    for start, end, first, last in PUSHES:
        slope = undb(np.interp(T, [start, end], [first, last]))
        press = press + slope * stroke(start, end, PUSH_ATTACK_S, PUSH_RELEASE_S)
    return press


# colour of the old box: f/Hz, level/dB
OLD_BOX_COLOUR = [(88, -60.5), (150, -29), (426, -8), (496, -4), (844, -4), (1210, -1), (1700, -3),
                  (1910, -18), (2260, -3.5), (2690, -20), (3130, -10.5), (4480, -14.5), (5120, -27.5),
                  (6070, -29), (14000, -51)]
# resonances of the old mill: f/Hz, width f/Hz, level/dB
OLD_RESONANCES = [(501, 28, -5), (940, 150, -6), (1085, 36, -4), (2200, 40, -6.5), (2462, 19, -16),
                  (3410, 140, -3.5), (3650, 49, -11.5), (4486, 75, -4), (6070, 180, -18), (6500, 170, -18)]
# colour of a catch in the old mill: f/Hz, level/dB
OLD_TOOTH_COLOUR = [(240, -41.5), (400, -17.5), (1420, -1), (2030, -3.5), (2690, -8.5), (3290, -1),
                    (4010, -7.5), (4560, 0.5), (5110, -22.5), (6150, -16.5), (8060, -39), (9160, -38.5),
                    (12000, -40.5), (15600, -71), (22000, -120)]
# rusty burr teeth catching: t/s, peak level/dB
OLD_TEETH = [(0.277, -55), (0.528, -40), (0.571, -26), (0.675, -27.5), (0.888, -31.5), (0.911, -40),
             (1.127, -37), (1.862, -23), (1.889, -16.5), (1.917, -17), (1.974, -15.5), (2.095, -35.5),
             (2.314, -24), (2.557, -36.5), (3.655, -17.5), (3.849, -17.5), (4.066, -22.5), (4.159, -25),
             (4.189, -28)]


def old_mill(firm_db=-42):
    """Rusty burrs scrape and catch; a light touch mostly sings in the hopper, a firm one rattles the box."""
    press = old_pressure() * undb(1.1 * walk(35)) / undb(firm_db)  # 1 is a firm push
    hopper = modes([(497.4, 30, 4.5), (968.0, 19, 3), (1360, 40, -12), (1572, 39, -0.5), (1726, 50, -6.5)])
    rim = modes([(1573, 6.1, -0.5), (3115, 8.2, -3.0), (4130, 4.8, -6.5), (8900, 7, -16.5)])
    box = body(OLD_BOX_COLOUR, t60=.02, rattle_db=4.0, room_db=-13.5) + undb(-16) * modes(OLD_RESONANCES)
    scrape = undb(firm_db) * grit(rate=1000, spread_db=3.5, clump_hz=68.97, clump_db=3.0)
    # the box answers pressure more steeply than the steel hopper
    rattle = ring(scrape * press ** 1.4, box)
    song = ring(scrape * press ** .7, hopper)

    tooth = body(OLD_TOOTH_COLOUR, t60=0.026, rattle_db=0.5, room_db=-13.0)
    tooth += undb(-16.5) * hopper + undb(-10) * rim
    catches = blows(OLD_TEETH, tooth, skid_s=0.0025, skid=0.47)
    return undb(-1.0) * rattle + undb(-7.5) * song + undb(-2) * catches


def scene():
    """Everything, heard from close in front of the sill."""
    squeaks = sum(squeal(rows, third_db=-25.0, fourth_db=-35.5, jitter=0.045, shimmer=1.2,
                         rasp_db=-16.5, ring_db=-17.5) for rows in SPINDLE_SQUEAKS)
    screech = squeal(SPINDLE_SCREECH, third_db=-12.5, fourth_db=-38.5, jitter=0.01, shimmer=0.95,
                     rasp_db=-2.5, ring_db=-19)
    old = old_mill() + judder() + undb(-1.5) * squeaks + undb(-2.0) * screech + creaks() + groan()
    return (old + whistle() + new_mill() + handling() + beans() + kitchen())[None]


TOP_HZ = 15800


def record(dry):
    """The recorder cuts the top: a steep low-pass."""
    return signal.sosfilt(signal.ellip(10, .2, 80, TOP_HZ, fs=SR, output="sos"), dry)


dry = scene()
out = record(dry)
generate_wav(out)
```